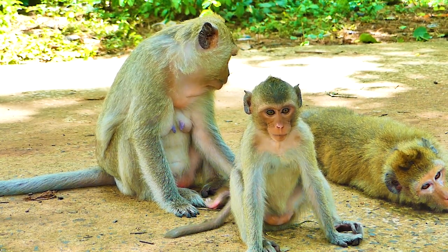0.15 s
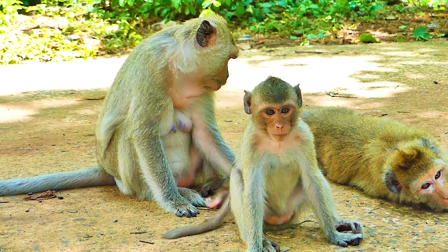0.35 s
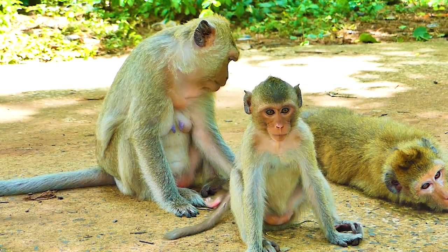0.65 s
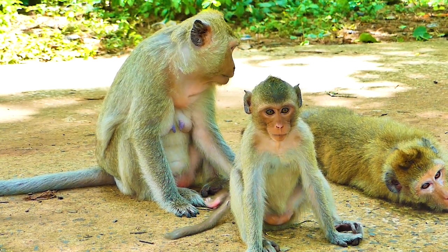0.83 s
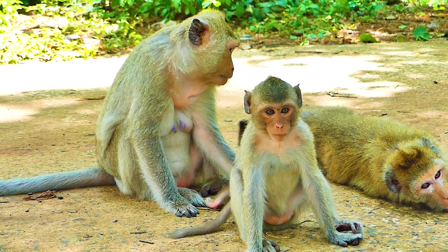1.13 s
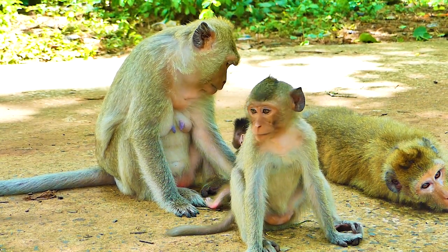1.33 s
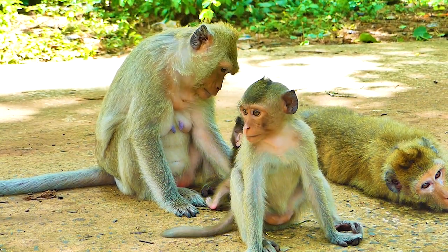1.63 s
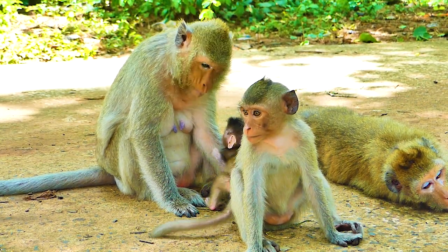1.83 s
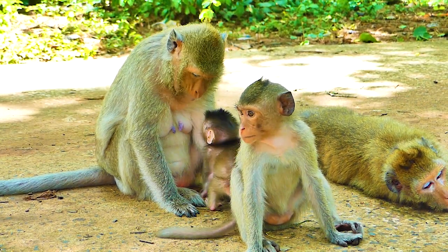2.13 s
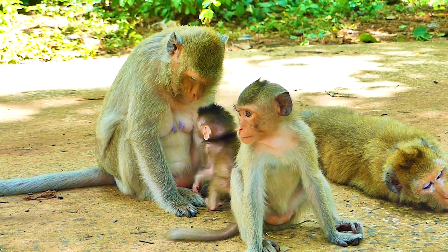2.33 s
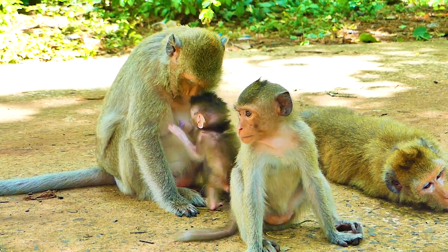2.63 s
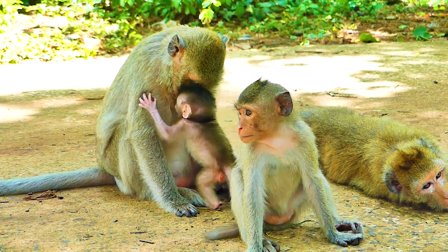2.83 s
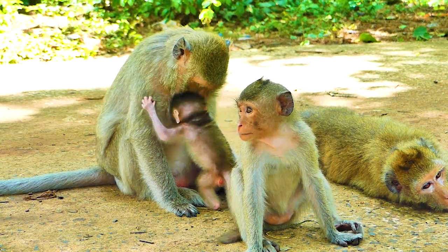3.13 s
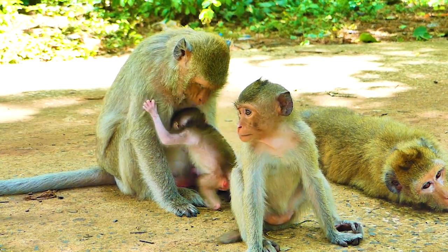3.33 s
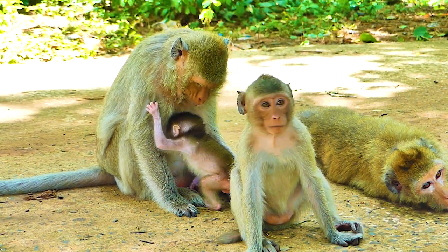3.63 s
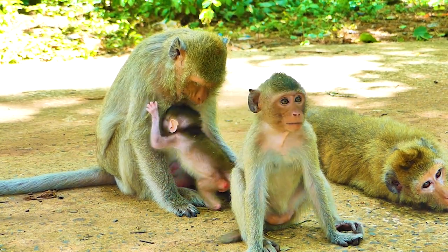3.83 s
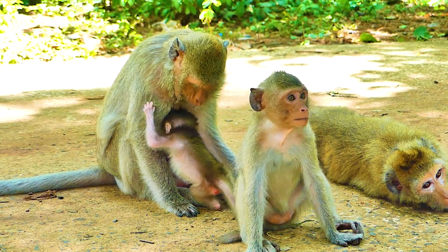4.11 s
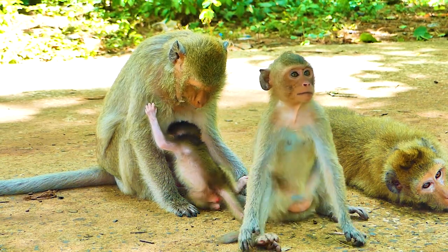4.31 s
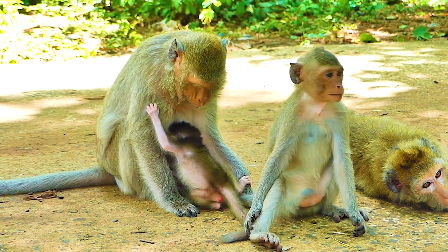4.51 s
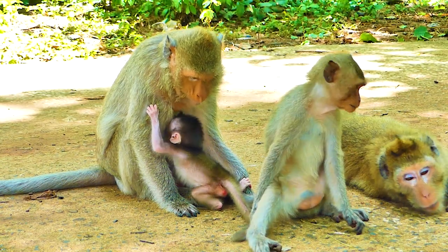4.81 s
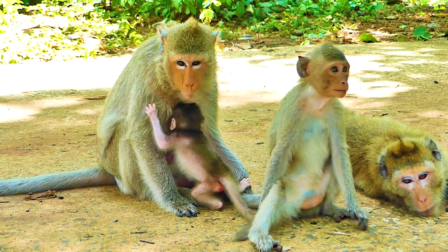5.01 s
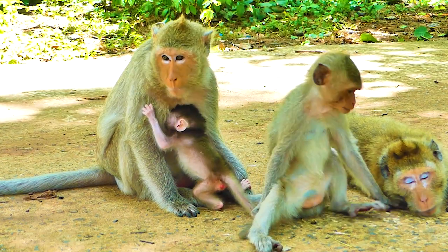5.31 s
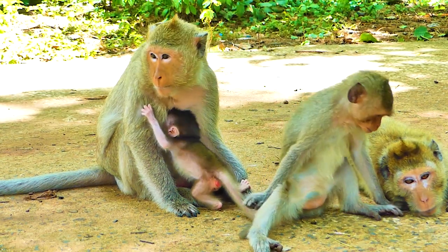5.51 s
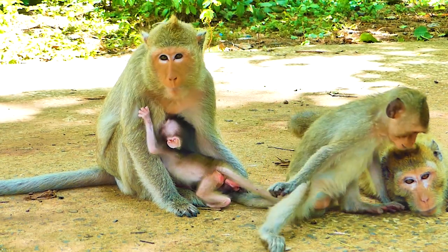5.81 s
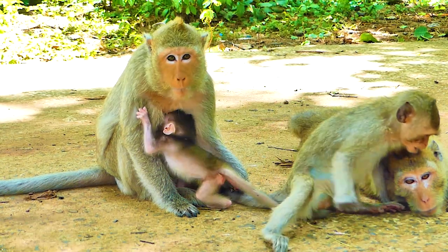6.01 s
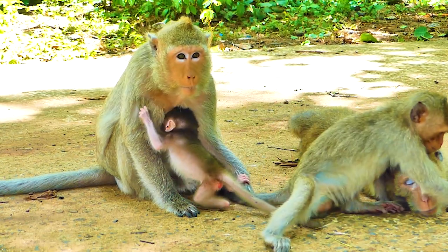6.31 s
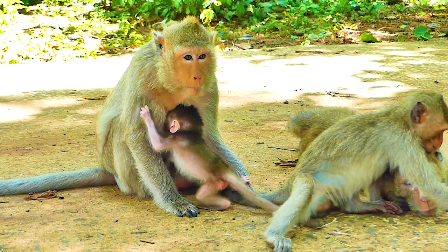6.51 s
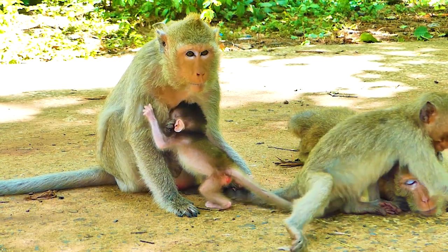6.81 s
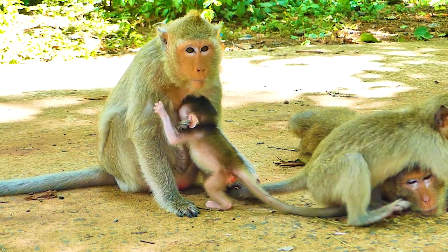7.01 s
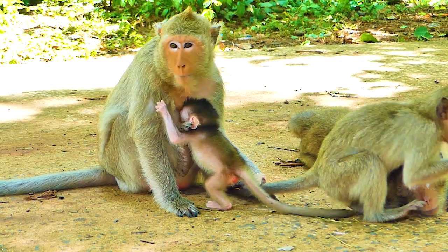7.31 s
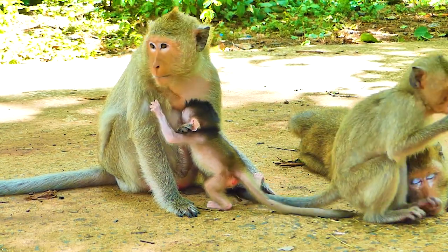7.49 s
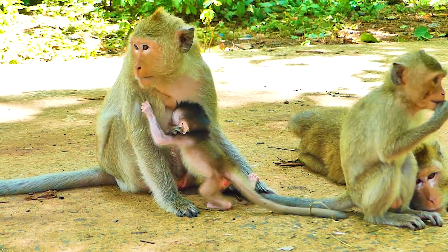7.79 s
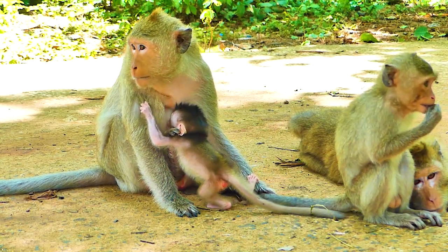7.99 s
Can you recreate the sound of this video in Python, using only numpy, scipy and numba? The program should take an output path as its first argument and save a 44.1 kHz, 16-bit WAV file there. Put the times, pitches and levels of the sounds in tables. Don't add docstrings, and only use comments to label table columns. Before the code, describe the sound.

Pulsing, steadily strengthening high insect trill over soft leaf hiss and distant hum; small litter crackles, then a close cluster of sharp cracks and gritty scuffs.

```python
import sys
import numpy as np
from scipy import signal
from scipy.fft import rfft, irfft
from scipy.io import wavfile
from scipy.ndimage import uniform_filter1d
from numba import njit

SR = 44100
rng = np.random.default_rng(int(sys.argv[2]) if len(sys.argv) > 2 else 0)


def to_linear_factor(level_db):
    exponent = np.asarray(level_db, float) / 20
    return 10 ** exponent


def int16_out(signal):
    q = np.round(np.clip(np.atleast_2d(signal).T, -1, 1) * 32767)
    wavfile.write(sys.argv[1], SR, q.astype(np.int16))


N = 359415
T = np.arange(N) / SR

# (frequency [Hz], level per Hz [dB])
AIR_COLOUR = [(15, -76), (25, -86), (60, -14), (167, -6), (199, -1.5), (257, -10.5), (338, -9), (362, -10),
              (388, -10.5), (537, -11), (730, -20.5), (1400, -24), (1500, -27), (1950, -26.5), (3300, -120)]
# (frequency [Hz], level per Hz [dB])
LEAF_COLOUR = [(700, 2), (1300, -2.5), (2500, 0), (4000, -2.5), (6000, -3.5), (7500, -8), (9500, -5.5),
               (12000, -8.5), (15500, -12), (17000, -38)]
# (frequency [Hz], likeness [-1 to 1])
LIKENESS = [(30, -0.95), (130, 0.6), (300, -0.25), (1200, -0.2), (2400, 0.38), (5000, 0.73), (9000, 0.68),
            (15000, 0.16)]
# (time [s], level over the calm rustle [dB], half length [s])
GUSTS = [(0.12, 3.5, 0.07), (0.834, 4.5, 0.2), (1.75, 2, 0.22), (3.1, 2.5, 0.075), (3.466, 5, 0.071),
         (3.932, 7.5, 0.22), (4.267, 2.5, 0.12), (4.804, 3.5, 0.18), (5.4, 5, 0.14), (6.544, 3.5, 0.3),
         (7.935, 2.5, 0.14)]

# (start [s], length [s], from [Hz], to [Hz], level [dB])
SONG = [(1.31, 0.042, 2820, 3230, -59), (1.36, 0.055, 2870, 2830, -70), (1.485, 0.055, 3340, 3280, -62.5),
        (1.49, 0.056, 3210, 2890, -59.5), (1.535, 0.08, 2900, 2736, -59), (1.605, 0.071, 2715, 2680, -67),
        (1.68, 0.044, 3130, 3000, -64), (1.735, 0.038, 2930, 2880, -67), (1.79, 0.058, 3080, 3090, -68),
        (1.955, 0.084, 3050, 2730, -61), (2.03, .04, 2790, 2500, -61), (2.06, 0.12, 2470, 2370, -61),
        (2.25, 0.079, 2700, 2565, -59.5), (2.32, 0.035, 2600, 2660, -68), (2.445, 0.075, 2980, 2710, -60),
        (2.52, .07, 2720, 2510, -56.5), (2.59, 0.044, 2473, 2467, -50), (2.72, .12, 2450, 2450, -73)]
# (start [s], length [s], from [Hz], to [Hz], level [dB])
ANSWER = [(1.34, 0.042, 3100, 3980, -58), (1.37, 0.071, 4020, 3600, -67), (1.44, 0.082, 3830, 3680, -67),
          (1.605, 0.059, 3400, 3330, -55), (1.62, 0.0898, 3230, 3050, -60), (2.03, 0.048, 2950, 3940, -57),
          (2.07, 0.062, 3940, 3470, -58), (2.27, 0.065, 2750, 2970, -59), (2.06, .06, 3010, 2900, -63),
          (2.32, 0.05, 3620, 3400, -56.5), (2.32, 0.074, 3270, 3120, -61), (6.05, 0.05, 2870, 2830, -58)]
# (start [s], length [s], from [Hz], to [Hz], level [dB])
CALL = [
    (6.133, 0.019, 2760, 3250, -44.5),
    (6.155, 0.018, 3350, 3150, -44.5),
    (6.175, 0.043, 3180, 2584, -49),
]
# (start [s], length [s], from [Hz], to [Hz], level [dB])
WHISTLES = [(4.72, 0.11, 2180, 2046, -65), (4.83, 0.088, 1990, 2020, -60), (4.935, 0.053, 2025, 2017, -59),
            (5.132, 0.055, 2290, 2237, -58.5), (5.187, 0.065, 2200, 2175, -55.5),
            (5.252, 0.06, 2130, 2077, -59), (5.31, 0.11, 2060, 1990, -57.5), (6.57, 0.036, 2100, 1830, -63),
            (6.595, 0.11, 1830, 1795, -61.5), (6.69, 0.045, 1790, 1700, -67),
            (6.74, 0.11, 1705, 1687, -64.5), (6.968, 0.032, 2070, 1875, -65.5),
            (7.0, 0.19, 1885, 1657, -71.5), (7.24, 0.11, 2010, 1860, -75), (7.92, 0.18, 1777, 1790, -70.5)]
# (time [s], peak level [dB], top pitch [Hz])
CHIPS = [
    (2.6164, -57, 6450),
    (4.23, -52, 6370),
    (7.7428, -51, 6650),
]

# (start [s], length [s], level [dB])
BRUSHES = [
    (0.037, 0.0093, -39),
    (4.388, .015, -58),
    (8.021, 0.052, -55.5),
    (8.145, .01, -54),
]
# (time of peak [s], peak level [dB], ring [Hz], half length [ms])
KNOCKS = [(0.168, -61, 2110, 3.5), (5.9143, -25, 4630, 0.84), (0.85, -55, 1610, 3), (5.411, -39, 3200, 2),
          (5.418, -41, 4500, 1.5), (5.439, -45, 3100, 1.4), (5.459, -37, 3100, 1.5), (5.92, -35, 2550, 1.8),
          (5.937, -35, 3050, 1.6), (5.942, -32, 2950, 1.4), (5.954, -35, 3000, 1.4),
          (6.221, -49, 1190, 2.5), (7.73, -49, 2500, 1.6), (7.737, -38, 1200, 1.4), (7.743, -48, 1140, 2.3),
          (7.805, -58, 2250, 4), (7.843, -46, 470, 4), (1.189, -40, 580, 1.4), (2.189, -51, 2920, 2.2),
          (4.7565, -41, 2500, 1.6), (4.764, -40, 2210, 1.8), (4.7945, -50, 2800, 1.3),
          (4.831, -37, 2280, 1.7), (4.994, -39.5, 604, 1.8), (5.012, -50, 1700, 1.1),
          (5.056, -37, 730, 1.2), (5.3985, -22, 427, 1.13), (5.3985, -27.5, 2400, 2.8),
          (5.4015, -28, 1040, 1.8), (5.561, -32, 410, 1.2), (5.573, -37, 1210, 3.8),
          (5.5735, -36, 2020, 1.9), (5.588, -37, 640, 3.2), (5.612, -24, 496, 0.7), (5.63, -38.5, 730, 2),
          (5.875, -42, 3220, 1.2), (5.8845, -35, 3220, 2.1), (5.8955, -38, 3370, 3),
          (5.9135, -16, 2555, 1.5), (5.9275, -38, 700, 1.7), (5.9435, -35, 830, 1.1),
          (5.9495, -33, 1010, 1.4), (5.953, -45, 885, 0.85), (5.9135, -37, 397, 1.3),
          (6.455, -41, 5450, 2.4), (6.4665, -29, 2580, 2.1), (6.483, -40, 415, 2.2),
          (6.5425, -45, 960, 5.7), (7.7342, -30, 2660, 0.35)]

# (time [s], peak level [dB], ring [Hz], thud [dB], snap [dB])
CRACKLE = [(0.0386, -54, 1840, 10, 19), (0.1646, -48, 2430, -7, -4), (0.192, -45, 4500, -17, -15),
           (0.2384, -55, 5000, -15, -3), (0.424, -56, 5600, -20, 2), (0.479, -56, 5600, -20, 0),
           (0.26, -50.5, 2440, 3, -22), (0.696, -43, 1420, 1, -9), (0.813, -45, 3940, -14, -9),
           (0.836, -42.5, 3300, -8, -1), (1.1867, -50, 2580, 2, -1), (1.3034, -46.5, 4150, -3, -16),
           (1.4288, -48.5, 3960, -3, -2), (1.5985, -44.5, 2760, -14, 4), (1.8407, -39.5, 3790, -9, -15),
           (2.1842, -35.5, 2920, -5, -6), (2.2789, -42, 2480, -1.5, -1.5), (3.3059, -45.5, 4600, -26, -3),
           (3.4124, -48.5, 5470, -18, -8), (3.7755, -42.5, 3500, -17, -6), (4.3854, -64, 2620, -6, 13),
           (7.235, -39.5, 4100, -19, -16), (7.452, -54, 3000, -14, -24), (7.5163, -53, 3080, -11, -24)]
# (time [s], peak level [dB], ring [Hz], thud [dB], snap [dB])
RISING = [(4.7563, -37, 2390, -10, -31), (4.7935, -35.5, 3500, -22, 0), (4.81, -30.5, 2400, -9, -29),
          (4.9915, -38, 2070, 9.5, -25), (5.0096, -37, 1300, -1, -30), (5.0135, -37.5, 2390, -17, -28),
          (5.0183, -43, 2440, -11, -18), (5.0508, -38, 1550, 9, -33), (5.19, -44, 1460, -15, -15.5),
          (5.3975, -17.5, 2650, -8.5, -6), (5.4532, -30, 3020, 0.5, -5), (5.5586, -42, 1960, 11, -12),
          (5.5715, -28.5, 1950, -1, -9.5), (5.6121, -37, 2240, 4, -12)]
# (time [s], peak level [dB], ring [Hz], thud [dB], snap [dB])
WALKING = [(5.8236, -36, 2360, -11, -15.5), (5.883, -27, 3180, -25, -12), (5.894, -26.5, 3600, -18, -17.5),
           (6.0284, -39.5, 3170, -4, 0), (6.4652, -29.5, 2640, -1.5, -7), (6.481, -33, 2880, -9, 0),
           (6.541, -33.5, 2070, -15, -14), (6.565, -44, 2480, 1, -26), (7.7335, -26.5, 2650, -10.5, -23)]
# (time [s], peak level [dB], ring [Hz], thud [dB], snap [dB])
TWIGS = [(5.9118, -17.5, 2940, -9, -6.5), (4.8222, -34, 3000, -4, -12), (4.8245, -32.5, 2480, -3, -12),
         (6.3036, -21.5, 2680, -11.5, -22), (6.3085, -35, 2900, -1, -20), (5.497, -22, 2790, -12, -25),
         (5.6084, -23.5, 2460, -7.5, -33), (6.6285, -32, 4930, -10, -10), (6.6615, -23.5, 3730, -14, -9),
         (6.791, -25, 3300, -13.5, -11), (7.202, -27.5, 2460, -18, -13), (7.2494, -38, 3730, -21, 3.5),
         (7.8265, -30.5, 3480, -9, 0.5)]

# (centre [Hz], width [Hz], level [dB])
GRIT_MODES = [(1300, 860, -22), (2030, 840, 18), (2820, 330, 15), (4080, 260, -10)]
# (start [s], length [s], peak level [dB], low part [dB], high part [dB])
DRAGS = [
    (0.11, 0.087, -60, -11, 2),
    (3.29, 0.067, -65.5, -8, 11),
    (4.77, 0.075, -49.5, 1, -34),
    (4.99, 0.072, -54, -12, -20),
    (5.43, 0.039, -41, -4, -14),
    (5.55, 0.073, -48, 7.5, -3),
    (5.87, 0.049, -43.5, 1.5, -29),
]
# (start [s], length [s], peak level [dB], low part [dB], high part [dB])
SLIDES = [
    (5.402, 0.029, -39, -3, -2),
    (5.972, 0.2, -54.5, -2, -24),
    (6.47, 0.041, -48.5, 5.5, -6),
    (6.535, 0.081, -59.5, 9, -27),
    (7.203, 0.1, -52.5, -22, -5),
    (7.72, 0.055, -51, 5, -21),
    (7.8, 0.12, -65, 9, -10),
    (7.99, 0.072, -71.5, 5, 0),
]
# (start [s], length [s], peak level [dB], low part [dB], high part [dB])
SCRAPES = [
    (5.592, .017, -47, -8, -15),
    (5.83, 0.042, -54, -9, -22),
    (5.916, 0.055, -39, 0, -39),
]

# (time of pitch dip [s], peak level [dB], pitch climbed to [Hz], fade [dB/s], climb [s])
SWELLS = [(0.06, -61, 5360, 58, 0.1), (0.45, -59.5, 5370, 45, .2), (1.27, -55.5, 5380, 55, 0.16),
          (2.11, -55, 5370, 39, 0.27), (2.93, -55, 5270, 29, 0.26), (3.77, -53, 5280, 38, 0.13),
          (4.58, -51, 5330, 15, 0.14), (5.38, -52, 5480, 9.5, 0.1), (6.18, -48.5, 5474, 14.5, 0.14),
          (6.975, -48, 5410, 15.5, 0.13), (7.76, -49, 5460, 4, 0.15)]
# (frequency [Hz], level [dB])
STRANDS = [(4925, -6), (5003, -4), (5052, -6), (5124, -4), (5193, 2), (5264, -1), (5284, -1), (5340, 0.5),
           (5413, 0.5), (5456, -1), (5506, 0.5), (5541, 3), (5604, -2)]


def level(x, db):
    return x * to_linear_factor(db) / np.sqrt(np.mean(x ** 2) + 1e-30)


def band(x, lo_hz, hi_hz):
    return signal.sosfilt(signal.butter(2, [lo_hz, hi_hz], "band", fs=SR, output="sos"), x)


@njit
def moving_resonance(x, hz, width):
    y, b, l = np.empty(len(x)), 0., 0.
    for i in range(len(x)):
        g, k = np.tan(np.pi * hz[i] / SR), width / hz[i]
        v = (b + g * (x[i] - l)) / (1 + g * (g + k))
        b, l, y[i] = 2 * v - b, l + 2 * g * v, k * v
    return y


def still_resonance(x, hz, width):
    return moving_resonance(x, np.full(N, 1. * hz), 1. * width)


def walk(rate):
    hold = int(SR / rate)
    steps = np.repeat(rng.standard_normal(N // hold + 1), hold)
    return 1.36 * uniform_filter1d(uniform_filter1d(steps, hold), hold)[:N]


def decay(t, t60, rise_s):
    return np.exp(-np.log(1000) * t / t60) * (1 - np.exp(-t / rise_s))


def pan(x, db):
    return x * to_linear_factor(np.array([db / 2, -db / 2]).reshape(2, -1))


def trees(x, t60, side_db):
    tail = rng.standard_normal((2, SR)) * decay(T[:SR], t60, 0.0067)
    tail = tail / np.sqrt(np.sum(tail[0] ** 2))
    mid, side = signal.fftconvolve(x[None], tail, axes=1)[:, :N]
    return np.array([mid + to_linear_factor(side_db) * side, mid - to_linear_factor(side_db) * side])


def background(colour, flicker_db, rate):
    hz = np.fft.rfftfreq(N, 1 / SR) + 1

    def read(table):
        points = np.array(table)
        return np.interp(np.log(hz), np.log(points[:, 0]), points[:, 1])

    alike = np.clip(read(LIKENESS), -.95, .95)
    gain = to_linear_factor(read(colour)) * np.sqrt([1 + alike, 1 - alike])
    out = 0
    for centre in 20 * 2 ** np.arange(0, 10, .5):
        share = np.sqrt(np.clip(1 - np.abs(2 * np.log2(hz / centre)), 0, 1))
        mid, side = irfft(rfft(rng.standard_normal((2, N))) * gain * share, N)
        out = out + to_linear_factor(flicker_db * walk(rate)) * np.array([mid + side, mid - side])
    return out / np.sqrt(np.mean((out[0] + out[1]) ** 2) / 4)


def distant_air():
    return to_linear_factor(-55) * background(AIR_COLOUR, 2.27, 4.5)


def leaves():
    stir_db = sum(db * np.exp(-((T - s) / half) ** 2) for s, db, half in GUSTS)
    calm_db = -62
    return to_linear_factor(calm_db + stir_db) * background(LEAF_COLOUR, 0.98, 23)


def bird_notes(rows, waver, settle, fade_db):
    out = np.zeros(N)
    for s, length, from_hz, to_hz, db in rows:
        on = (T > s) & (T < s + length)
        done = (T[on] - s) / length
        edge = np.clip(np.minimum(done, 1 - done) * length / 0.0031, 0, 1)
        hz = from_hz + (to_hz - from_hz) * (1 - (1 - done) ** settle)
        tone = np.sin(2 * np.pi * np.cumsum(hz * (1 + waver[on])) / SR)
        out[on] += np.sqrt(2) * edge * to_linear_factor(db - fade_db * (done - .5)) * tone
    return out


def songbirds():
    tight, loose = .009 * walk(200), .028 * walk(260)
    song = bird_notes(SONG, tight, settle=2.35, fade_db=9.0)
    song = song + bird_notes(ANSWER, loose, settle=1.4, fade_db=2)
    flutter = to_linear_factor(3 * walk(60))
    far = to_linear_factor(-7) * pan(song, -1.5) + to_linear_factor(-2.5) * trees(song * flutter, .42, -6)
    call = bird_notes(CALL, tight, settle=1.4, fade_db=7.0)
    return far + to_linear_factor(-4.5) * call + to_linear_factor(-5.0) * trees(call, 0.49, -11)


def whistling_bird():
    whistle = bird_notes(WHISTLES, .004 * walk(90), settle=2.4, fade_db=4.0)
    whistle = whistle * to_linear_factor(2.5 * walk(60))
    return pan(whistle + to_linear_factor(-6) * trees(whistle, .45, -8), -7.5)


def chipping_bird():
    chips, t = np.zeros(N), T[:int(.013 * SR)]
    arch = np.sin(np.pi * t / t[-1])
    for s, db, top_hz in CHIPS:
        phase = 2 * np.pi * np.cumsum(top_hz * (0.827 + 0.152 * arch)) / SR
        chips[int(s * SR):][:len(t)] += to_linear_factor(db) * arch ** 0.051 * np.sin(phase)
    return chips * to_linear_factor(3.5) + to_linear_factor(5.5) * trees(chips, 0.56, -10.0)


def brushes():
    hiss = level(band(band(rng.standard_normal((2, N)), 7600.0, 11000.0), 8400.0, 17000.0), 0)
    strokes = sum(to_linear_factor(db) * (T > s) * np.exp(-(np.abs(T - s) / length) ** 3) for s, length, db in BRUSHES)
    specks_per_s, speck_db = 9, -53.5
    specks = (rng.random(N) < specks_per_s / SR) * to_linear_factor(speck_db + 3 * rng.standard_normal(N))
    specks = signal.lfilter([1], [1, -np.exp(-1 / (0.0018 * SR))], specks)
    specks = specks * level(band(rng.standard_normal((2, N)), 2700.0, 13000.0), 0)
    return specks + hiss * strokes


def knocks():
    out, t = np.zeros(N), T[:int(.02 * SR)] - .01
    for s, db, hz, half_ms in KNOCKS:
        swell = np.exp(-(1000 * t / half_ms) ** 2)
        out[int((s + t[0]) * SR):][:len(t)] += to_linear_factor(db) * swell * np.sin(2 * np.pi * hz * t)
    return pan(out, -5.5)


def placed_ticks():
    # (ticks, tail length as share of the longest, left minus right [dB])
    groups = (CRACKLE, 0.94, 11), (RISING, 0.68, -11), (WALKING, 0.65, -11), (TWIGS, .23, -6)
    return np.array(sorted((*row, tail, side_db) for rows, tail, side_db in groups for row in rows))


def aim(low, mid, high, db):
    def turn(x, share):
        return x + share * np.tanh(db / 6) * signal.hilbert(x).imag * np.array([[1], [-1]])

    return pan(turn(low, 0.45), 0.59 * db) + pan(mid, db) + pan(turn(high, 0.61), 0.16 * db)


def ticks():
    out, t = np.zeros((2, N + SR)), T[:int(.06 * SR)]
    blow = np.exp(-((t - .0004) * 6700.0) ** 2)

    def peak(x):
        return x / np.max(np.abs(x))

    def fade(t60):
        return decay(t, t60, 0.00031)

    for s, db, hz, thud_db, snap_db, tail, side_db in placed_ticks():
        noise = rng.standard_normal((3, len(t)))
        dryness_db = snap_db - .5 * min(db + 45, 0)
        width = np.interp(dryness_db, [-17, -12.5], [1.425, 1.81])
        tone = np.interp(dryness_db, [-17, -12.5], [0.85, 0.53])
        crumble = band(blow + .5 * noise[0] * fade(0.069 * tail), hz / width, hz * width)
        crumble = band(crumble, hz / width / 4, min(hz * width * 3.2, SR / 2.5))
        ring = tone * fade(0.0083 * np.sqrt(tail)) * np.sin(2 * np.pi * hz * t) + crumble
        thud = band(1.84 * blow + noise[1] * fade(0.12 * tail), 122.0, 1550.0)
        snap = band(band(noise[2] * fade(0.012 * tail), 5100.0, 10700.0), 4200.0, 13300.0)
        low, high = to_linear_factor(thud_db) * peak(thud), to_linear_factor(snap_db) * peak(snap)
        start = int(s * SR)
        out[:, start:start + len(t)] += to_linear_factor(db) * aim(low, peak(ring), high, side_db)
    return out[:, :N]


def scuffs():
    size = to_linear_factor(3 * np.minimum(rng.exponential(size=N), 3)) * rng.standard_normal(N)
    grains = (rng.random(N) < 1800 / SR) * size
    grains = (level(grains, 0) + .7 * rng.standard_normal(N)) * to_linear_factor(2.2 * walk(90))
    mid = level(sum(to_linear_factor(db) * still_resonance(grains, hz, width) for hz, width, db in GRIT_MODES), 0)
    low = level(band(grains, 290.0, 1590.0), 0)
    high = level(band(band(grains, 2500.0, 6000.0), 3400.0, 18000.0), 0)
    near_ticks = placed_ticks()
    side_db = np.interp(T, near_ticks[:, 0], near_ticks[:, -1])
    out = np.zeros((2, N))
    # (rows, place of the peak [share of length], rise [dB], fall [dB])
    kinds = (DRAGS, 0.85, 10.5, 20), (SLIDES, 0.062, 28, 17), (SCRAPES, 0.85, -2, 12)
    for rows, peak, rise_db, fall_db in kinds:
        for s, length, db, low_db, high_db in rows:
            on = (T > s) & (T < s + length)
            done = (T[on] - s) / length
            edge = np.clip(np.minimum(done, 1 - done) * length / 0.0011, 0, 1)
            press = edge * to_linear_factor(db + np.interp(done, [0, peak, 1], [-rise_db, 0, -fall_db]))
            out[:, on] += press * aim(to_linear_factor(low_db) * low[on], mid[on], to_linear_factor(high_db) * high[on], side_db[on])
    return out


def cicada_swells():
    s, db, top_hz, fade, climb = np.transpose(SWELLS)[:, :, None]
    dip_hz, sink_s = 5190, 0.085
    lag_s, rise_db_s = 0.051, 72
    late = T - s
    dip = np.exp(-(late / np.where(late < 0, sink_s, climb)) ** 2).max(axis=0)
    late = late - lag_s
    power = to_linear_factor(2 * (db + np.minimum(rise_db_s * late, -fade * late))).sum(axis=0)
    top_hz = np.interp(T, np.ravel(s + climb), top_hz[:, 0])
    return 10 * np.log10(power), top_hz + (dip_hz - top_hz) * dip


def body_ring(x, hz, width):
    for _ in range(3):
        x = moving_resonance(x, hz, width)
    return level(x, 0)


def far_cicada():
    return to_linear_factor(-70 + 1.5 * walk(3)) * body_ring(rng.standard_normal(N), 5410 + 15 * walk(2), 200)


def cicada():
    db, hz = cicada_swells()
    chance = rng.standard_normal((4000, 2))
    at = (np.cumsum(np.clip(1 + .06 * chance[:, 0], .2, 2) / 218) * SR).astype(int)
    clicks = np.zeros(N)
    clicks[at[at < N]] = to_linear_factor(4.1 * chance[at < N, 1])
    bursts = level(signal.lfilter([1], [1, -np.exp(-1 / (.0015 * SR))], clicks), 0) + 3
    mid, side = bursts * rng.standard_normal((2, N))
    effort = np.clip((db + 60) / 11, 0, 1)
    sunk_hz = 5450 - hz
    apart = 75 + 40 * effort + (.25 + .33 * effort) * sunk_hz
    upper = to_linear_factor(-sunk_hz / 62.0) * body_ring(mid, hz + apart, 167.0)
    middle = 0.71 * body_ring(mid, hz, 450.0)
    lower = 1.3 * body_ring(mid, hz - apart, 320.0)
    belly = to_linear_factor(-9.0 - sunk_hz / 200.0) * body_ring(mid, 4450 - 0.64 * sunk_hz, 300.0)
    voice = level(upper - middle + lower + belly, 0)
    strands = sum(to_linear_factor(gain_db) * still_resonance(voice, line_hz, 12) for line_hz, gain_db in STRANDS)
    voice = level(voice + level(strands, -.5), 0)
    spread = to_linear_factor(-15.5) * body_ring(side, hz, 480.) * np.array([[1], [-1]])
    return to_linear_factor(db) * (voice + spread)


def scene():
    birds = songbirds() + whistling_bird() + chipping_bird()
    near = ticks() + scuffs() + knocks()
    clearing = to_linear_factor(-21.5) * trees(near.mean(axis=0), 1.0, -2.0)
    return distant_air() + leaves() + birds + brushes() + near + clearing + far_cicada() + cicada()


def low_pass(x):
    return signal.sosfilt(signal.butter(12, 16520, fs=SR, output="sos"), x)


def record(dry):
    mix = signal.lfilter(*signal.iirnotch(7520, 120, fs=SR), dry)
    mix = signal.sosfilt(signal.ellip(8, .3, 40, 15750, fs=SR, output="sos"), mix)
    return low_pass(mix)


dry = scene()
out = record(dry)
int16_out(out)
```